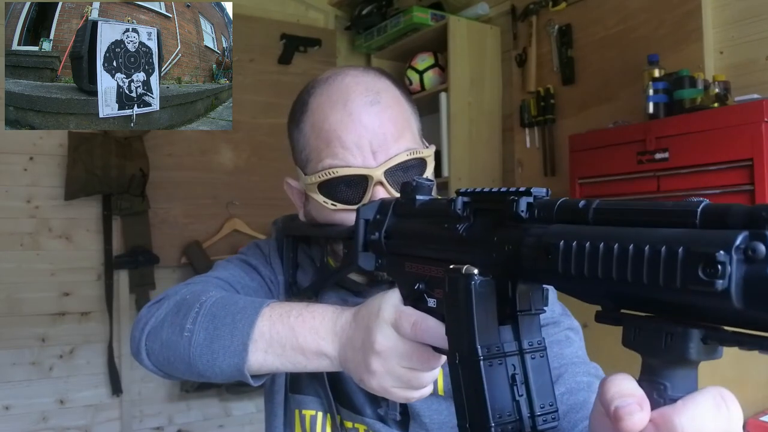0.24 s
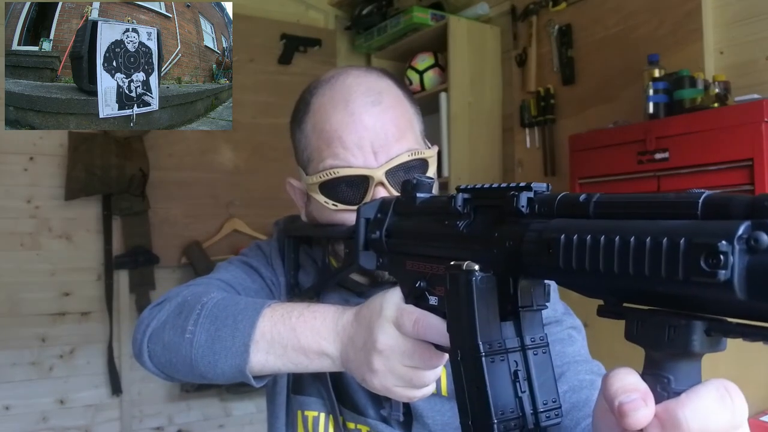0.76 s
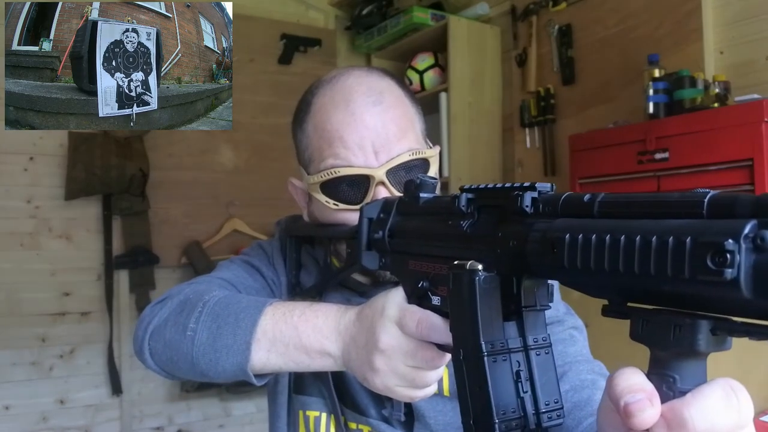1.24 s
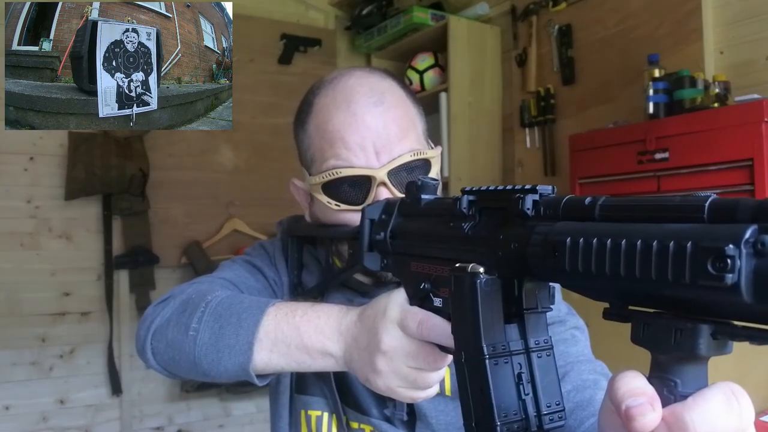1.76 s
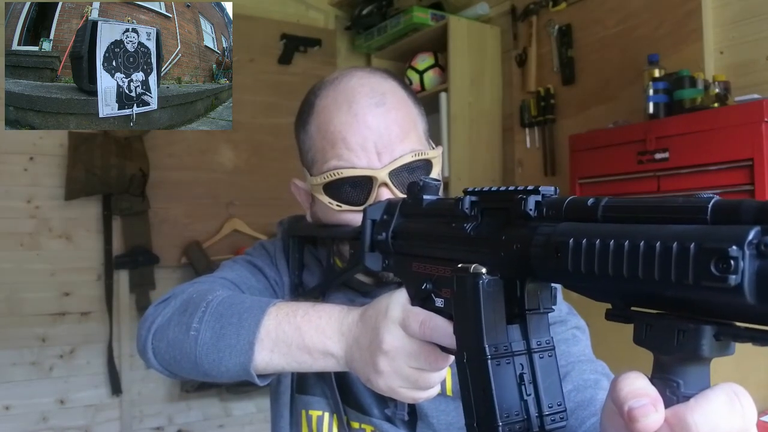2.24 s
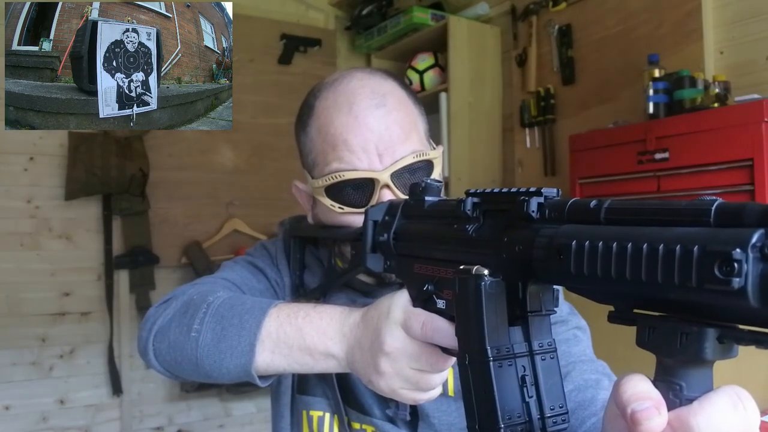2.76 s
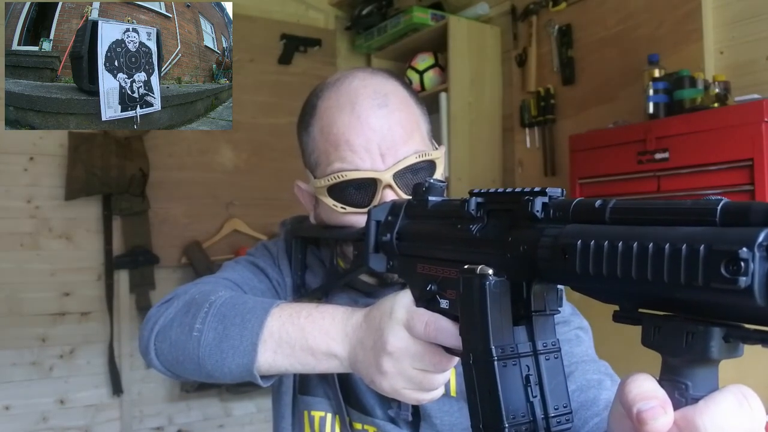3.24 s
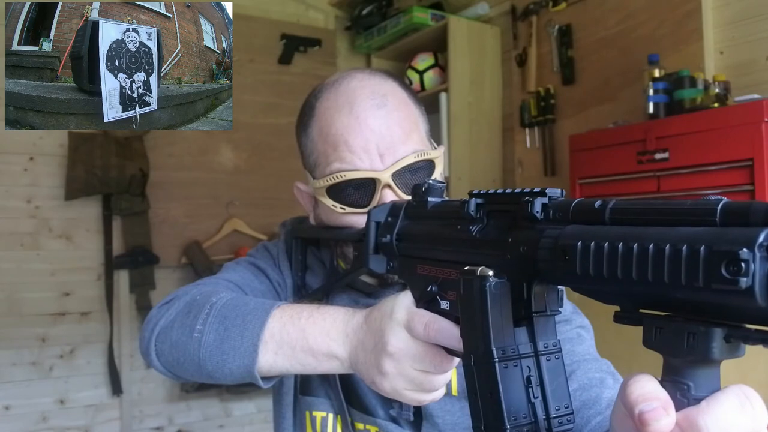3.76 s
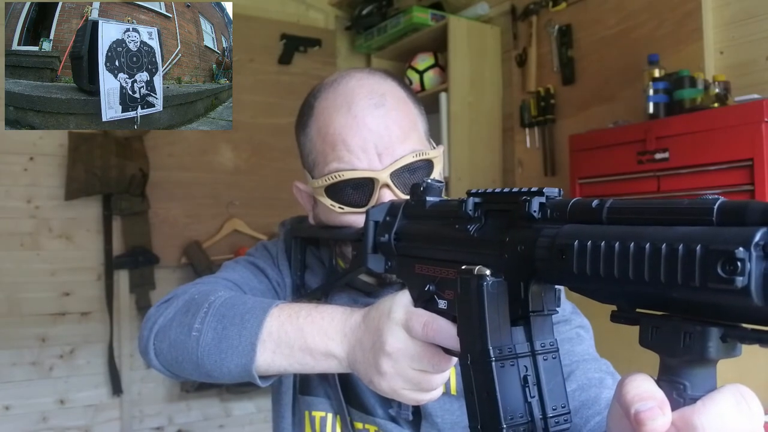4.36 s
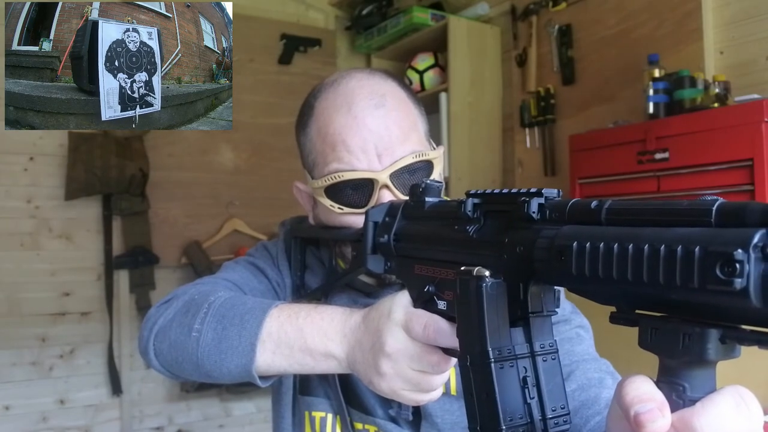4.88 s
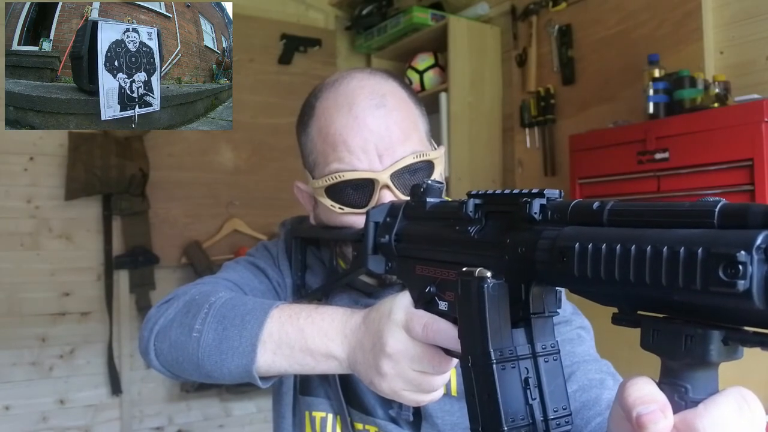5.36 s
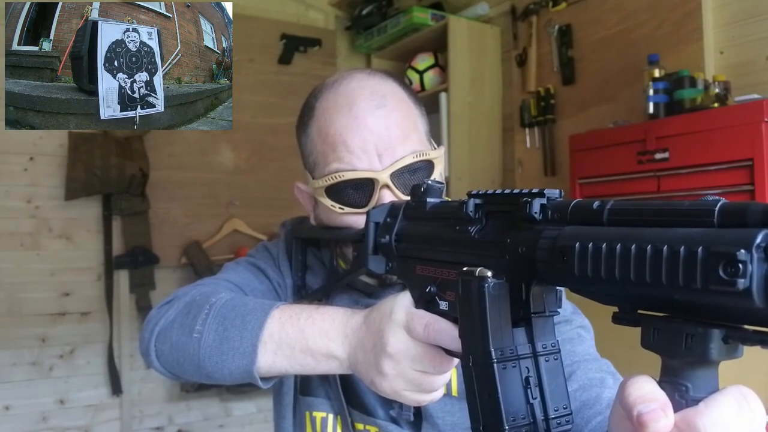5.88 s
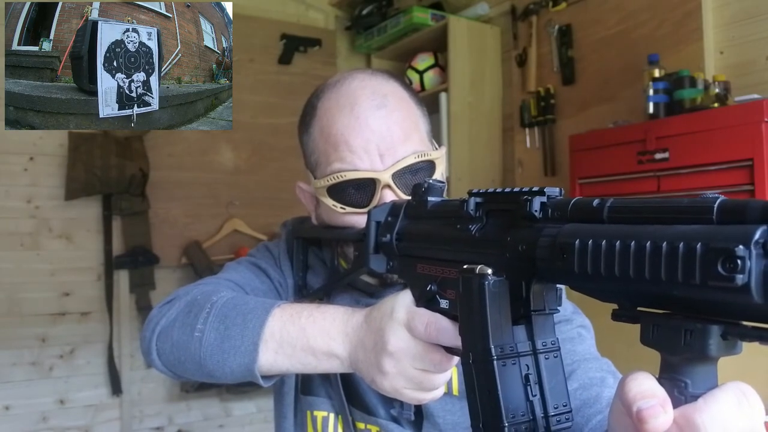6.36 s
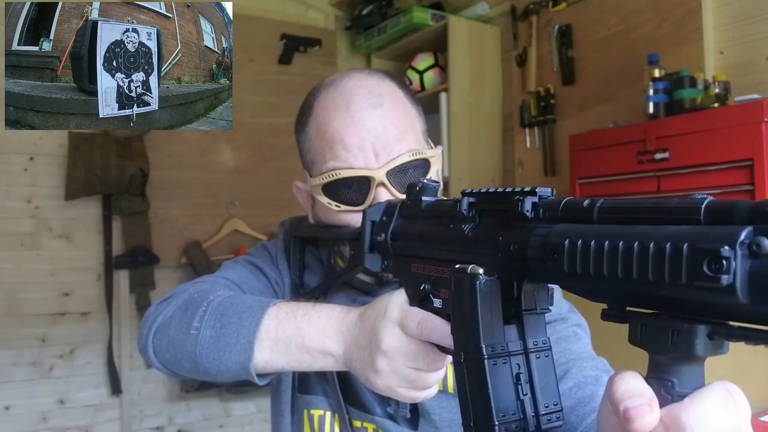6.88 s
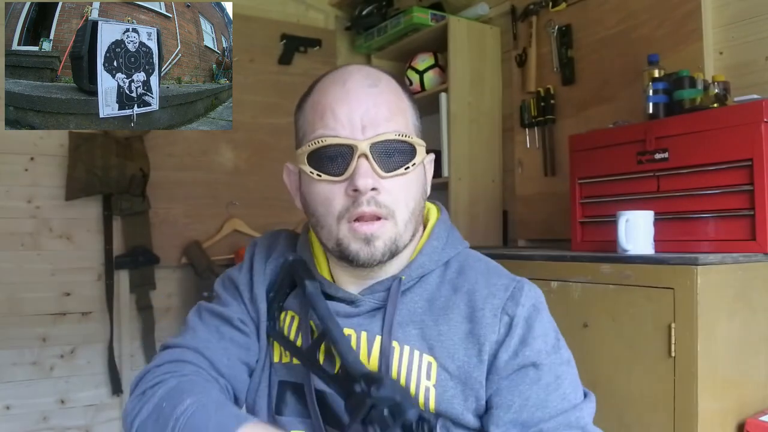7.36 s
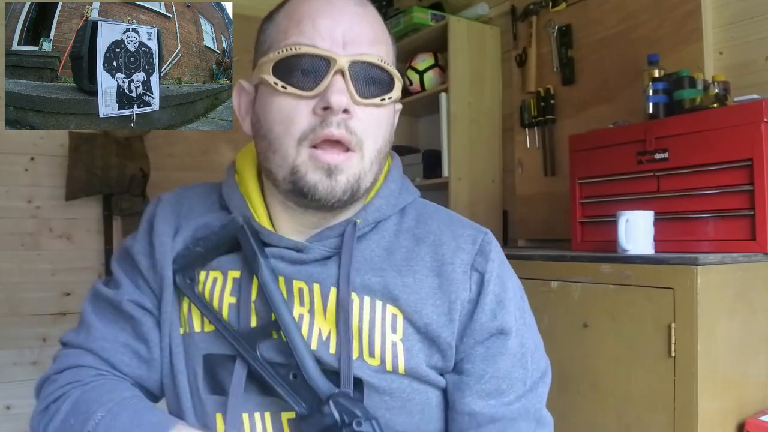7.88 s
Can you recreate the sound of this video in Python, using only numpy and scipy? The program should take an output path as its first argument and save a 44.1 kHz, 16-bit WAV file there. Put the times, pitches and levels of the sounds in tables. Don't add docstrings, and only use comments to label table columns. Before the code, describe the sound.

Faint hum and boxy room air, then a sudden gear zip and three loud dry clacks from a nearby airsoft gun. Pauses separate two shots, four shots and three shots, each followed by dull hollow pellet impacts farther off. The background sinks after firing and slowly swells again under automatic gain. Tiny pellet ticks, sleeve rustle and metallic sling clicks close the take in the small wooden shed.

```python
import sys
import numpy as np
from scipy import signal
from scipy.fft import rfft, irfft, next_fast_len
from scipy.io import wavfile
from scipy.ndimage import uniform_filter1d

SR = 44100
rng = np.random.default_rng(int(sys.argv[2]) if len(sys.argv) > 2 else 0)


def output_pcm(signal):
    pcm = np.clip(np.atleast_2d(signal).T, -1, 1) * 32767
    wavfile.write(sys.argv[1], SR, np.round(pcm).astype(np.int16))


def level_to_linear(level):
    exponent = np.asarray(level, float) / 20
    return 10 ** exponent


N = 358047
T = np.arange(N) / SR
FFT_SIZE = next_fast_len(N)
HZ = np.fft.rfftfreq(FFT_SIZE, 1 / SR)

# [start t/s, ramp t/s, from level/dB, to level/dB, sag dB/s]
WIND_UPS = [
    (1.102, .012, -22.5, -11.5, 91),
    (3.395, .05, -23.5, -12, 220),
    (4.812, .018, -35, -26.5, -300),
    (6.372, .025, -37.5, -23, -130),
]
# [f/Hz, level over the grind/dB]
TOOTH_NOTES = [
    (2596, -5.5),
    (2920, -5.5),
    (2300, -10.5),
    (2500, -12.5),
]
# [t/s, peak level/dB]
TRIGGER_BITES = [
    (1.1037, -6),
    (3.3945, -3.5),
    (4.8117, -15),
]
# [first shot t/s, gain drop/dB, running gear level/dB, trigger released t/s, pop
# level/dB]
BURSTS = [
    (1.183, 8.5, -36, 1.42, -18.5),
    (3.487, 10, -30.5, 3.57, -22.5),
    (4.8402, 8.5, -34.5, 5.15, -20),
    (6.427, 4, -32.5, 6.505, -16.5),
]
# [t/s, peak level/dB, thump level/dB, rattle level/dB]
SLAMS = [(1.178, -15, -33.5, 6), (1.2685, -11, -31, 0), (1.3597, -9.5, -29.5, -1.5),
         (3.479, -20.5, -29, 11.5), (3.5722, -9.5, -31, -0.5), (4.8375, -12, -32.5, 1),
         (4.9350, -10.5, -31.5, -2), (5.0207, -10, -33, -4), (5.106, -10, -28.5, -2.5),
         (6.4215, -10.5, -33, -1), (6.517, -9.5, -30.5, -1.5), (6.6012, -10, -29, -0.5)]
# [delay t/s, level/dB, t60/s]
STROKE_PARTS = [
    (-.0025, -7, .012),
    (0, 2, .015),
    (.0078, 0, .016),
    (.0125, -3, .012),
    (.020, -8, .02),
    (.0262, -6, .02),
]
# [f/Hz, level/dB]
GEAR_COLOUR = [(120, -51.5), (200, -24), (642, -3.5), (756, -11), (976, -4.5), (1910, -7), (2300, 0.5),
               (2660, -3.5), (3250, -5), (3560, -5.5), (4850, -17.5), (7240, -11), (10400, -10),
               (13000, -19), (15600, -43)]
# [f/Hz, level/dB]
SLAM_COLOUR = [(88, -42), (150, -9), (279, -10.5), (396, -7.5), (596, -8), (1110, -8.5), (1700, -6),
               (2060, -9), (3230, -1.5), (6130, -5.5), (9950, -11.5), (14100, -24.5), (15600, -43.5)]
# [f/Hz, level/dB, t60/s]
CASING_MODES = [(1840, -6, 0.01), (3210, -4, .014), (4780, -5.5, 0.024), (10320, 4.5, 0.0066)]
# [f/Hz, level/dB, t60/s]
SHELL_MODES = [(161.5, -4, 0.27), (215, -1, 0.057), (269, 2, 0.069), (567, -4.5, 0.02), (900, -6, 0.027)]
# [t/s, peak level/dB, hollow ring level/dB, crack level/dB]
TARGET_HITS = [(1.481, -20.5, -50, -0.5), (1.552, -21.5, -53, -1.5), (1.568, -24, -57, 1),
               (3.677, -32, -49.5, -4), (3.701, -28, -54, -3), (3.759, -20, -50.5, -3),
               (5.211, -20, -60, -13), (5.293, -19.5, -50, -7), (6.701, -21, -52.5, -12),
               (6.79, -20, -51.5, -8)]
# [f/Hz, level/dB]
SMACK_COLOUR = [(210, -12), (350, -8), (704, -7.5), (852, -12.5), (1210, -8), (1770, -8), (2760, -7.5),
                (8120, -13), (12100, -22.5), (15600, -42)]
# [f/Hz, level/dB, t60/s]
BACKSTOP_MODES = [(187, -10.5, 0.25), (278, 2.5, 0.33), (732, -1, 0.31), (1217, 0.5, 0.21)]
# [t/s, peak level/dB, centre f/Hz, after-hiss level/dB, treble level/dB]
SMALL_KNOCKS = [(0.1767, -33, 2200, -27, -38), (1.8647, -46.5, 1504, -6.5, -20),
                (2.3755, -55.5, 2186, -7, -11), (5.6294, -67, 2395, 4.5, -23),
                (5.7694, -61.5, 2880, -6, -14), (5.97, -60.5, 2020, -3.5, -20),
                (6.1754, -54.5, 1563, -7.5, -19.5), (7.112, -46.5, 1550, -6, -19),
                (7.2474, -51.5, 1555, -4, -15), (7.397, -50.5, 2700, -15, -25),
                (7.4113, -46.5, 2750, -13, -9), (7.451, -44, 4700, -13, -6), (7.5088, -54, 2200, -7, -13),
                (7.529, -53, 2500, -12, -18.5), (7.546, -57.5, 7500, -12, -8), (7.5908, -48, 2833, -14, -9),
                (7.7279, -49.5, 3040, -13, -28), (7.798, -39.5, 2640, -18, -27),
                (8.0581, -38, 2436, -9, -3), (8.068, -43.5, 4420, -7.5, -11)]
# [f/Hz, level/dB, t60/s]
BUCKLE_MODES = [(3100, -10, .03), (5100, -7.5, .03), (6300, -3.5, 0.016), (7660, 6.5, 0.0072),
                (9400, -0.5, 0.012), (11400, -7, 0.0086)]
# [t/s, level/dB]
CLOTH_LEVEL = [(5.5, -87.5), (5.7, -81), (5.9, -67.5), (6.1, -68), (6.3, -85), (7.05, -78), (7.218, -70),
               (7.374, -67), (7.51, -61.5), (7.624, -55.5), (7.804, -68), (8.119, -58.5)]
# [f/Hz, level/dB]
CLOTH_COLOUR = [(590, -29.5), (1000, -12), (1240, -4), (1480, -13), (2230, -3), (3460, -6.5), (4060, -9),
                (6210, -11), (7460, -8.5), (11800, -19), (15600, -42)]
# [t/s, note level/dB, octave level/dB]
HUM_LEVEL = [(0, -53, -45), (.3, -63, -44.5), (.6, -60, -42.5), (1.05, -56, -49), (1.75, -40, -55.5),
             (2.0, -56.5, -54), (2.4, -41, -50), (2.7, -50, -54.5), (3.1, -39, -49), (3.4, -41, -52.5),
             (3.8, -41, -51), (4.75, -41.5, -50), (5.3, -49.5, -53), (5.65, -42, -71), (6.3, -41.5, -55),
             (7.0, -43, -53), (7.8, -41.5, -51.5), (8.1, -43.5, -50)]
# [f/Hz, level/dB]
AIR_COLOUR = [(18, -44), (30, -22), (59, -7.5), (164, -16), (202, -8), (250, -16.5), (300, -9), (351, -16),
              (1020, -19.5), (9720, -36.5), (15600, -62)]
# [f/Hz, level/dB]
PORT_HISS_COLOUR = [(1060, -30.5), (1800, -7.5), (3450, -6), (3950, -11.5), (4480, -8), (7560, -12.5),
                    (10900, -17), (15600, -27.5)]
# [t/s, level/dB, t60/s]
FLOOR_BUMPS = [(0, -43, .4), (.56, -47, 0.66), (2.4, -73, 1.5), (2.87, -53, 0.52), (4.77, -62, 0.3),
               (7.92, -47, 0.57), (8.03, -54, 0.41)]
# [creep starts t/s, depth level/dB]
GAIN_RECOVERY = [
    (2.1, -22),
    (4.15, -24),
    (5.65, -24),
    (7.05, -22.5),
]
# [f/Hz, t60/s]
SHED_DECAY = [(200, 0.13), (1000, 0.21), (3000, 0.24), (8000, 0.27), (15000, 0.39)]
# [f/Hz, phase/rad]
PORT_LEAD = [(0, 0), (2100, -.2), (3400, -.8), (4800, -3), (6500, -3.1), (9000, -6.3), (16000, -6.3)]


def gears():
    treble_db, brighten = -2.5, 0.28
    climb_hz_per_s, waver = 1500, .015
    clicks = rng.standard_normal((2, N)) * level_to_linear(1.2 * rng.exponential(size=N)) * level_to_linear(0.87 * walk(300))
    grind = ports(*colour(unit(clicks), GEAR_COLOUR), 0.95, 7800)
    low = unit(band(grind, 200, 4600))
    high = -unit(band(grind, 4600, 18000))

    bites = sum(fade(at, db - 12, 0.0016) for at, db in TRIGGER_BITES)
    out = bites * (high + 0.35 * low)
    for wind_up, burst, (hz, tooth_db) in zip(WIND_UPS, BURSTS, TOOTH_NOTES):
        start, ramp, from_db, to_db, sag = wind_up
        first_shot, drop_db, run_db, release, _ = burst
        winding_s = np.clip(T - start, 0, .1)
        load_db = np.interp(T, [start, start + ramp], [from_db, to_db])
        load_db = load_db - sag * np.clip(T - start - ramp, 0, .1)
        wind = (T > start) * (T <= first_shot) * level_to_linear(load_db - drop_db - 0.5)
        run = (T > first_shot) * level_to_linear(run_db - 60 * np.clip(T - release, 0, None) / 0.081)

        pitch = (hz + climb_hz_per_s * winding_s) * (1 + waver * walk(200))
        out += wind * level_to_linear(tooth_db + 3.0 * walk(150)) * np.sin(2 * np.pi * np.cumsum(pitch) / SR)
        wind_treble = wind * level_to_linear(treble_db + brighten * (load_db + 10.5))
        out += low * (wind + run) + high * (wind_treble + run * level_to_linear(-4.0))
    return out


def shots():
    knocks, rings, rattle, thumps = np.zeros((4, N))
    scatter = rng.standard_normal((len(SLAMS), len(STROKE_PARTS)))
    for (at, db, thump_db, rattle_db), chances in zip(SLAMS, scatter):
        for (lag, part_db, t60), chance in zip(STROKE_PARTS, chances):
            knocks += fade(at + lag, db + part_db + .7 * chance, t60, rise=0.00044)
            rings += ring(at + lag, db + part_db + 0.79 * chance, CASING_MODES, 0.0013)
        rattle = np.hypot(rattle, fade(at + 0.0013, db + rattle_db - 9.5, 0.48, rise=0.0035))
        thumps += ring(at + 0.0061, thump_db, SHELL_MODES, 0.00055)
    hit, other, near, far = colour(rng.standard_normal((4, N)), SLAM_COLOUR)
    clack = ports(knocks * hit + rings, 1.5 * knocks * other, 0.94, 5000, turned=0.97)
    return clack, rattle * ports(near, far, 0.96, 5000, turned=0.9), thumps


def burst_pops():
    lead_s, width_s, echo_s, echo_db = .0053, .0014, .0102, -6
    pops = np.zeros(N)
    for first_shot, *_, pop_db in BURSTS:
        for lag, db in (0, 0), (echo_s, echo_db):
            t = (T - first_shot + lead_s - lag) / width_s
            pops += level_to_linear(pop_db + db + 6.0) * -t * np.exp(-t ** 2)
    return pops


def target():
    hiss, echo, crack, note = np.zeros((4, N))
    for at, db, ring_db, crack_db in TARGET_HITS:
        hiss = np.hypot(hiss, fade(at, db - 14, .45, rise=.007))
        echo = np.hypot(echo, fade(at, db - 29.0, 1.1, rise=0.0067))
        crack += fade(at, db + crack_db, 0.044, rise=0.0055)
        note += ring(at + 0.00416, ring_db + 8.0, BACKSTOP_MODES, 0.0024)
    yard = ports(*colour(rng.standard_normal((2, N)), SMACK_COLOUR), 1.0, 2600)
    blur = hiss * level_to_linear(2.0 * walk(150)) * yard + echo * band(yard, 700, 4100)
    return blur + crack * unit(band(rng.standard_normal(N), 900, 2600)) + note


def knocks_and_cloth():
    knocks, after = np.zeros((2, N))
    noise = rng.standard_normal(N)
    for at, db, hz, after_db, treble_db in SMALL_KNOCKS:
        body = unit(band(noise, hz / 1.8, hz * 1.4))
        knocks += fade(at, db - 8.0, 0.059) * body
        knocks += ring(at, db - 0.5, [(hz, 0, .012)], .0003)
        knocks += ring(at, db + treble_db + 6.5, BUCKLE_MODES, 0.0002576)
        after += fade(at, db + after_db - 6.0, 0.44, rise=0.0039)
    t, db = np.transpose(CLOTH_LEVEL)
    grains = rng.standard_normal((2, N)) * level_to_linear(2 * rng.exponential(size=(2, N)))
    level = after + level_to_linear(np.interp(T, t, db, left=-150) - 4.5 + .9 * walk(49))
    rustle = ports(*unit(colour(grains, CLOTH_COLOUR)) * level, 0.87, 3500)
    return knocks + shed(knocks, -8) + rustle


def room_air():
    mid, side = colour(rng.standard_normal((2, N)), AIR_COLOUR)
    low = band(mid, 110, 2000) + 0.65 * band(side, 500, 2000) * np.array([[1], [-1]])
    low = low / np.std(band(mid, 480, 920))
    hiss = colour(rng.standard_normal((2, N)), PORT_HISS_COLOUR) * level_to_linear(-2.5)
    return level_to_linear(-53 + gain_db() + .8 * walk(9.5)) * (low + hiss)


def mains_hum():
    hum_hz, third_db = 100.1, -20
    t, *columns = np.transpose(HUM_LEVEL)
    duck = sum((T > shot) & (T < release + .05) for shot, _, _, release, _ in BURSTS)
    note_db, octave_db = (np.interp(T, t, column) + gain_db() - 8.3 * duck for column in columns)
    turn = 2 * np.pi * np.cumsum(hum_hz * (1 + 0.0031 * walk(8.2))) / SR
    note = np.sin(turn) + level_to_linear(third_db) * np.sin(3 * turn + 1)
    octave = np.sin(2 * turn + 0.24)
    return level_to_linear(note_db + 1.0 * walk(15)) * note + level_to_linear(octave_db + 0.84 * walk(13)) * octave


def floor_rumble():
    bumps = sum(fade(at, db, t60, rise=.02) for at, db, t60 in FLOOR_BUMPS)
    level = level_to_linear(-57 + gain_db() + 3.0 * walk(6)) + bumps
    near, far = unit(band(rng.standard_normal((2, N)), 49, 80)) * level
    return ports(near, far, 0.29, 5000)


def whine():
    whine_hz, whine_db = 2331, -79
    swell = np.interp(T, [3.9, 4.0, 4.5, 4.81], [0.025, 1.1, 1.2, 0.5], right=0)
    return level_to_linear(whine_db + 2 * walk(8.1)) * np.sin(2 * np.pi * whine_hz * T) * swell


def background():
    left, right = room_air() + np.sqrt(2) * (mains_hum() + whine()) + floor_rumble()
    return np.array([np.roll(left, 4), right])


def shed(x, wet_db):
    t, tails = T[:int(.9 * SR)], 0
    decay_hz, decay_s = np.transpose(SHED_DECAY)
    for hz in 90 * 2 ** np.arange(0, 7.6, .5):
        t60 = np.interp(np.log(hz), np.log(decay_hz), decay_s)
        mid, side = band(rng.standard_normal((2, len(t))), hz / 1.19, hz * 1.19)
        spread = min(hz / 5300.0, 1) * side * np.array([[1], [-1]])
        tails = tails + level_to_linear(-60 * t / t60) * (mid + spread)
    tails = tails * (1 - np.exp(-t / 0.0018)) / np.sqrt(np.sum(tails ** 2) / 2)
    return level_to_linear(wet_db) * signal.fftconvolve(x[None], tails, axes=1)[:, :N]


def ports(near, far, like, split_hz, turned=0):
    like = np.clip(like, 0, 1) * (.3 + .7 / (1 + (HZ / split_hz) ** 4))
    turn = np.exp(1j * turned * np.interp(HZ, *np.transpose(PORT_LEAD)))
    left = like * turn * rfft(near, FFT_SIZE) + np.sqrt(1 - like ** 2) * rfft(far, FFT_SIZE)
    return np.array([irfft(left, FFT_SIZE)[:N], near])


def gain_db():
    creep_db_per_s = 12
    out = np.zeros(N)
    for (first_shot, *_), (creep, depth_db) in zip(BURSTS, GAIN_RECOVERY):
        recovering = depth_db + creep_db_per_s * np.clip(T - creep, 0, None)
        out = np.where(T > first_shot, np.minimum(0, recovering), out)
    return out


def ring(at, db, modes, rise):
    hz, mode_db, t60 = np.transpose(modes)[:, :, None]
    hz = hz * (1 + .025 * rng.standard_normal(hz.shape))
    out, span = np.zeros(N), slice(int(at * SR) + 1, int((at + 2 * t60.max()) * SR))
    t = T[span] - at
    tones = level_to_linear(db + mode_db - 60 * t / t60) * np.sin(2 * np.pi * hz * t)
    out[span] = np.sum(tones, axis=0) * (1 - np.exp(-t / rise))
    return out


def fade(at, db, t60, rise=0.00039):
    out, t60 = np.zeros(N), max(t60, .003)
    span = slice(int(at * SR) + 1, int((at + 2 * t60) * SR))
    t = T[span] - at
    out[span] = level_to_linear(db - 60 * t / t60) * (1 - np.exp(-t / rise))
    return out


def walk(rate):
    k = int(SR / rate)
    steps = np.repeat(rng.standard_normal(N // k + 1), k)
    return unit(uniform_filter1d(uniform_filter1d(steps, k), k)[:N])


def colour(x, points):
    hz, db = np.transpose(points)
    gain = level_to_linear(np.interp(np.log(HZ + 1), np.log(hz), db, left=-90, right=-90))
    return irfft(rfft(x, FFT_SIZE) * unit(gain), FFT_SIZE)[..., :N]


def band(x, lo_hz, hi_hz):
    sos = signal.butter(2, [lo_hz, min(hi_hz, .45 * SR)], "band", fs=SR, output="sos")
    return signal.sosfilt(sos, x)


def unit(x):
    return x / np.sqrt(np.mean(x ** 2))


def scene():
    left_db = -1
    grind, (clack, rattle, thumps), pops = gears(), shots(), burst_pops()
    room = shed(grind[1] + clack[1], -4) + shed(thumps, -14.0)
    gun = band(grind + clack + rattle + thumps + room, 110, 20000)
    gun = gun + band(pops, 170, 5000) + 0.27 * pops
    open_db = 0
    for first_shot, drop_db, *_ in BURSTS:
        falling = np.exp(-np.clip(T - first_shot, 0, None) / .0008)
        open_db = open_db + drop_db * (T > first_shot - .2) * falling
    return gun * level_to_linear(open_db + [[left_db], [0]]) + target() + knocks_and_cloth() + background()


def roll_off(x):
    return signal.sosfilt(signal.butter(12, 15710, fs=SR, output="sos"), x)


def record(dry):
    low_pass = signal.ellip(10, .2, 80, 15700, fs=SR, output="sos")
    mix = signal.sosfilt(low_pass, np.clip(dry, -1, 1))
    return roll_off(np.clip(mix, -1, 1))


dry = scene()
out = record(dry)
output_pcm(out)
```